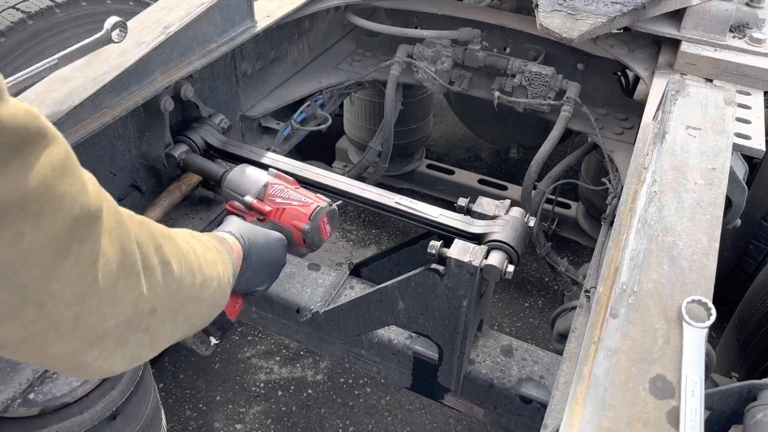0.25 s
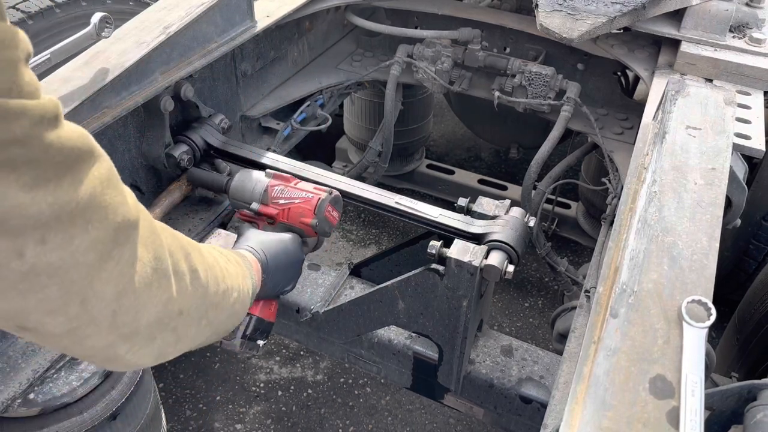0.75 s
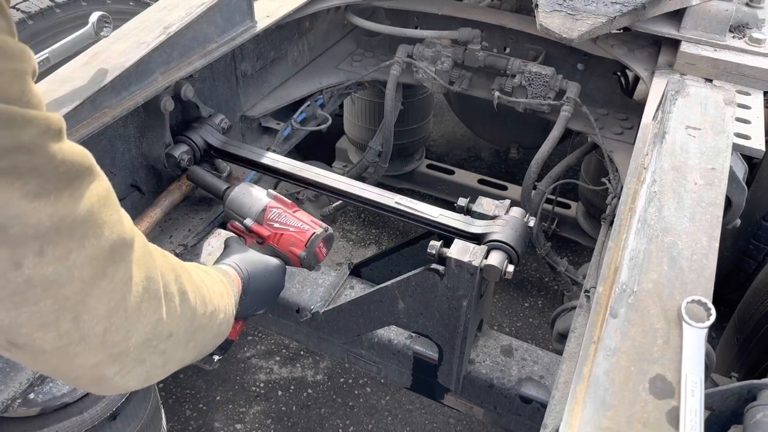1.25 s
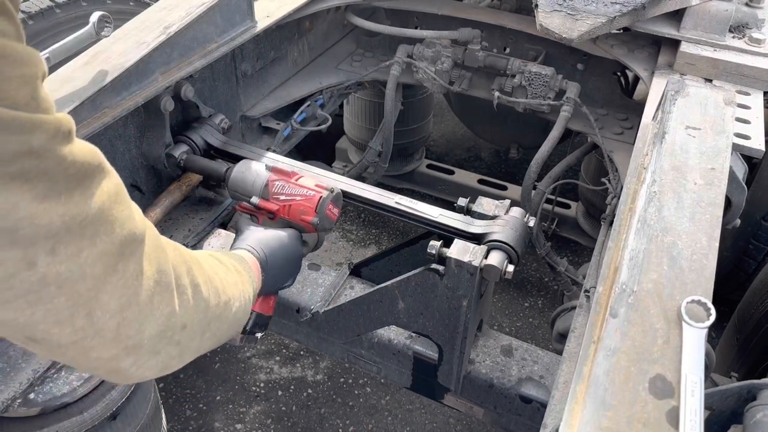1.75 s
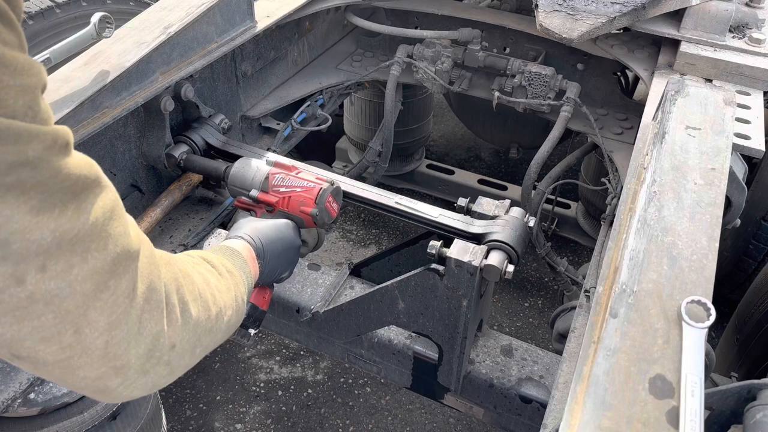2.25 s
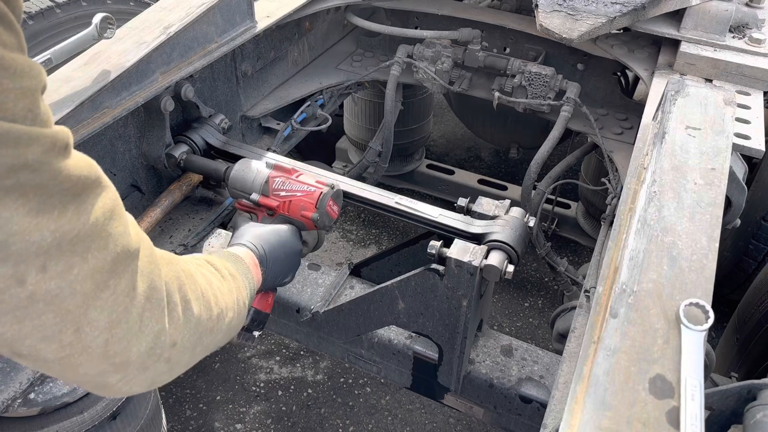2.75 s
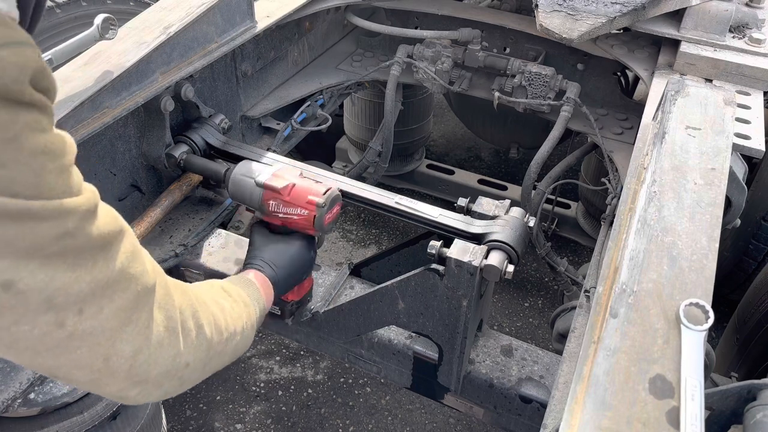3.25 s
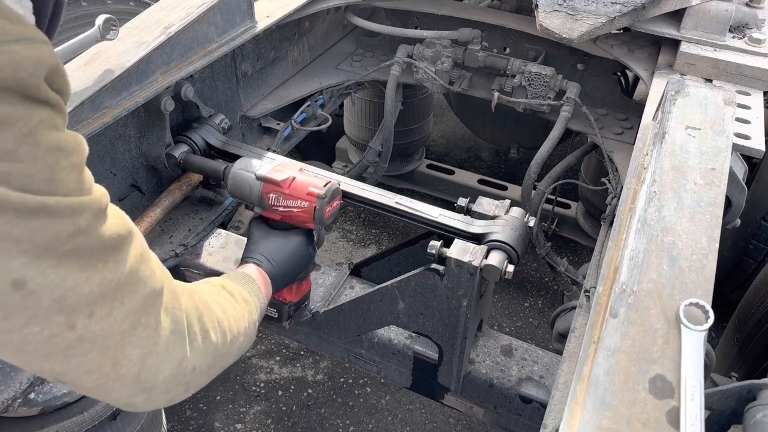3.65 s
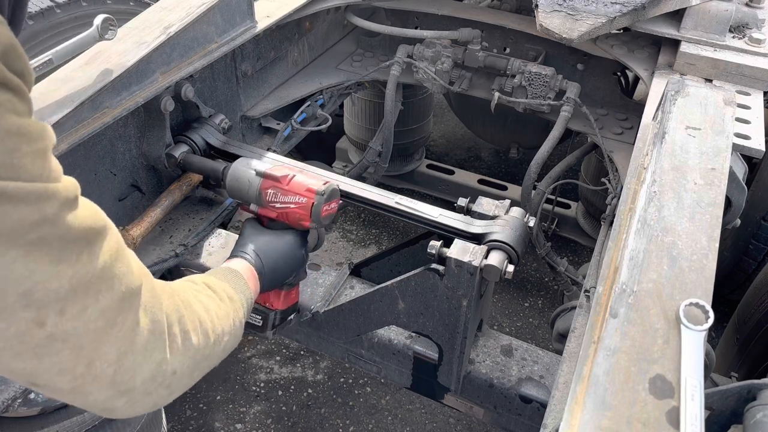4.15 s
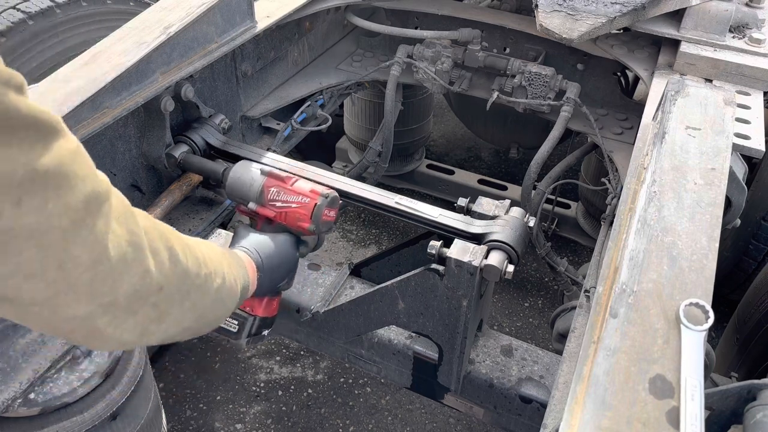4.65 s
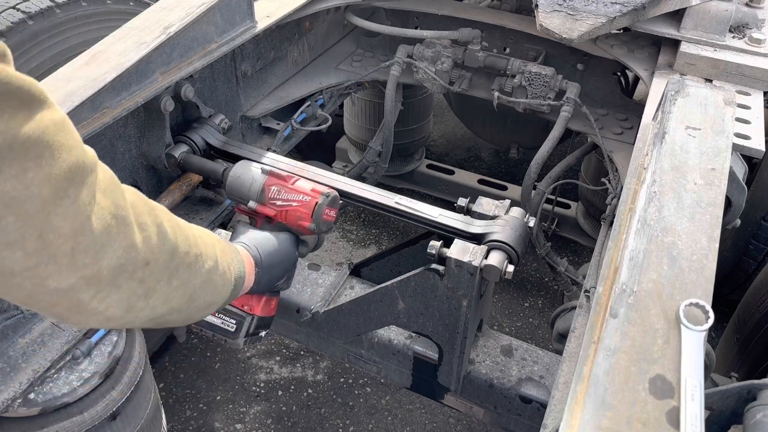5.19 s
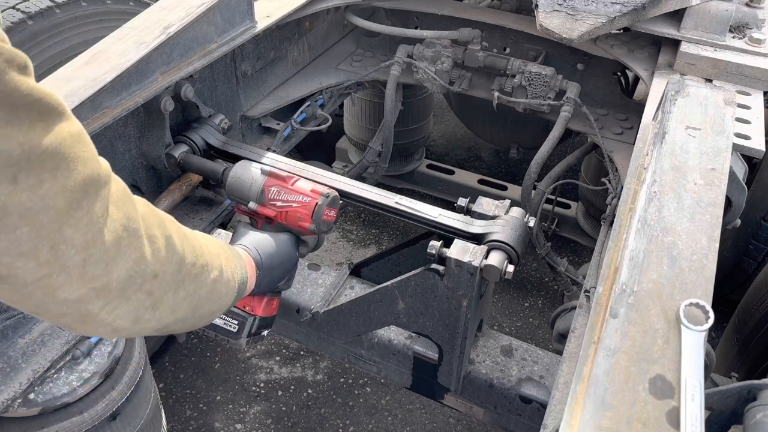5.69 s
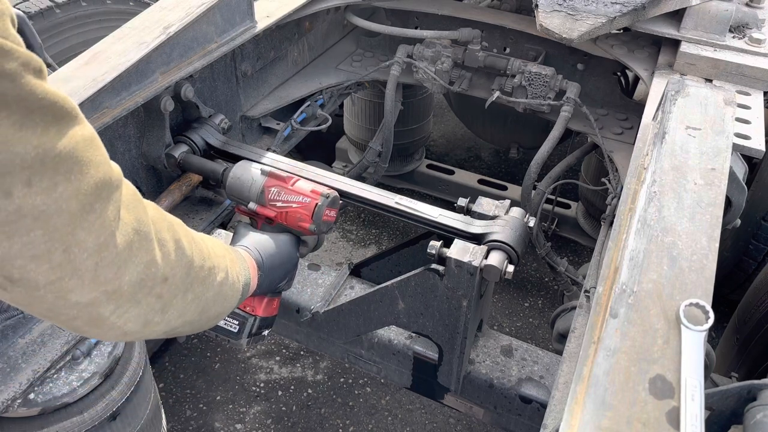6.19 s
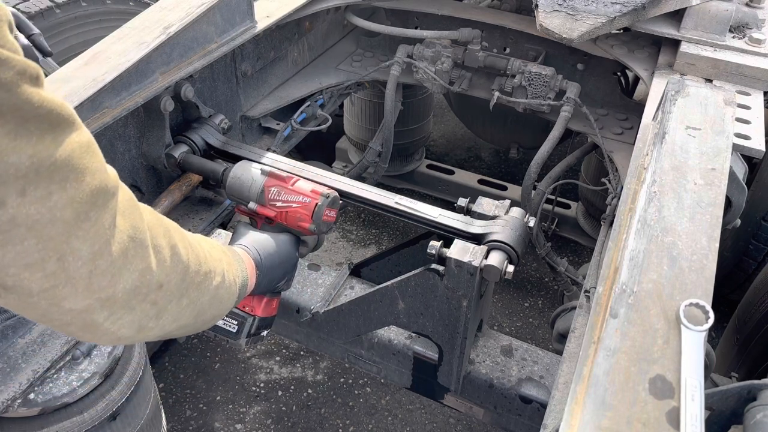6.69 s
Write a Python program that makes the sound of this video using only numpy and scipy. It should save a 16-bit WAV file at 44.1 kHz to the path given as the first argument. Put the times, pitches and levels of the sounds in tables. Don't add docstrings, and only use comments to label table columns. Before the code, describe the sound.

Close outdoor stereo, slightly left: a metal socket knocks and scrapes against a heavy steel frame, one hard clank standing out, then a faint squeak and lighter knocks. A power wrench whines briefly and hammers seven rapid metallic blows. After a dull knock and sparse light taps, the loose socket clinks brightly on the bolt head. Wind thumps the microphone throughout, over low distant rumble and soft hiss.

```python
import sys
import numpy as np
from scipy import signal
from scipy.fft import rfft, irfft, next_fast_len
from scipy.io import wavfile

SR = 44100
rng = np.random.default_rng(int(sys.argv[2]) if len(sys.argv) > 2 else 0)


def wav_out(sig):
    wavfile.write(sys.argv[1], SR, np.round(np.clip(np.atleast_2d(sig).T, -1, 1) * 32767).astype(np.int16))


def invert_db(x):
    u = np.asarray(x, float) / 20
    return 10 ** u


N = 305480
TIME = np.arange(N) / SR
RING_RISE_S = 0.00022

# time in seconds, peak level in dB at 2.5 kHz, flex of the panels in dB,
# t60 in seconds.
HAMMER_BLOWS = [
    (2.2304, -15.5, -23.5, 0.074),
    (2.2521, -13.5, -17, 0.14),
    (2.2821, -16, -11.5, 0.11),
    (2.3074, -15, -14.5, 0.12),
    (2.3311, -15.5, -11, 0.12),
    (2.3592, -19, -14, 0.22),
    (2.3868, -15.5, -11, 0.12),
]
# frequency in Hz, level in dB, t60 in seconds.
RAIL_MODES = [(994, -16.5, 0.14), (1190, -22, 0.31), (1490, -8, 0.34), (1692, -14, 0.17), (1840, -16, 0.34),
              (1990, -23, 0.19), (2200, -20, 0.16), (2350, -19.5, 0.31), (2520, -2.5, 0.14),
              (2700, -13.5, 0.38), (3610, -8, 0.13), (3600, -13.5, 0.066), (3940, -25.5, 0.03),
              (4320, -48, 0.052), (4850, -13.5, 0.079)]
# frequency in Hz, level in dB, share of the t60.
DENSE_MODES = [(120, -4.5, 1.4), (300, -7, 2.6), (586, -6, 1.3), (1140, 2, 0.96), (2030, -2, 0.84),
               (5220, 0, 0.73), (9690, 5, 0.39), (10500, 1.5, 0.089), (15850, -0.5, 0.42)]


def rms_one(x):
    return x / np.sqrt(np.mean(x ** 2) + 1e-20)


def in_time(rows):
    s, *columns = np.transpose(rows)
    return [np.interp(TIME, s, c) for c in columns]


def at_hz(points, hz, axis=1):
    points = np.array(points)
    return np.interp(np.log(hz), np.log(points[:, 0]), points[:, axis])


def drift(rate):
    r = np.exp(-80 * np.pi * rate / SR)
    white = rng.standard_normal(N // 40 + 2002)
    slow = signal.lfilter([1], [1, -2 * r, r * r], white)[2000:]
    return np.interp(np.arange(N) / 40, np.arange(len(slow)), rms_one(slow))


def ring(clicks, hz, t60):
    r = invert_db(-60 / (max(t60, .004) * SR))
    w = 2 * np.pi * hz / SR
    return signal.lfilter([0, np.sin(w)], [1, -2 * r * np.cos(w), r * r], clicks + 1e-18)


def band(x, low_hz, high_hz, order=2):
    return signal.sosfilt(signal.butter(order, [low_hz, high_hz], "band", fs=SR, output="sos"), x)


def colour(x, peaks):
    for hz, width_hz, db in peaks:
        x = x + (invert_db(db) - 1) * signal.lfilter(*signal.iirpeak(hz, hz / width_hz, fs=SR), x)
    return x


def pair(mid, side, alike):
    alike = np.clip(alike, 0, 1)
    return (np.sqrt(1 + alike) * mid + np.sqrt(1 - alike) * side * [[1], [-1]]) / np.sqrt(2)


def noise_bank():
    edges_hz = 100 * 2 ** np.arange(0, 7.6, .5)
    white = rng.standard_normal((2, 2, N))
    return [(np.sqrt(lo * hi), *band(white[k % 2], lo, hi))
            for k, (lo, hi) in enumerate(zip(edges_hz, edges_hz[1:]))]


def background(bank, patchy_db=2.2):
    # frequency in Hz, level in dB per Hz.
    air_spectrum = [(88, -25.5), (150, -21), (320, -4.5), (790, -7.5), (1100, -10), (2200, -21.5),
                    (4600, -34.5), (9000, -33), (11500, -41), (16000, -40)]
    # time in seconds, rumble level in dB.
    swell_curve = [(0, -62.5), (.7, -56.5), (1.6, -62), (5.5, -59.5), (5.9, -58.5), (6.93, -60.5)]
    # frequency in Hz, left-right likeness from 0 to 1.
    air_likeness = [(60, 0.87), (200, 0.29), (700, 0.0334), (2400, 0.05), (8000, 0.65), (14000, 0.12)]
    # frequency in Hz, level in dB.
    faint_tones = [(8473, -78.5), (14363, -68.5)]
    air_db = -51
    swell_db, = in_time(swell_curve)
    swell_db = swell_db - np.median(swell_db)
    air = np.zeros((2, N))
    for hz, mid, side in bank:
        level_db = at_hz(air_spectrum, hz) + swell_db * (hz < 3200) + patchy_db * drift(4.6)
        air += invert_db(level_db) * pair(np.roll(mid, SR), np.roll(side, SR), at_hz(air_likeness, hz))
    hum = sum(invert_db(db + 2 * drift(25)) * np.sin(2 * np.pi * hz * TIME + .12 * drift(30))
              for hz, db in faint_tones)
    return invert_db(air_db) * rms_one(air) + hum


def wind(lump_db=3.0, flutter_lump_db=3.5):
    # time in seconds, rumble level in dB.
    stream_curve = [(0, -44.5), (.1, -41.5), (.7, -38.5), (1.42, -44), (1.48, -26.5), (1.93, -24),
                    (2.02, -37.5), (2.9, -39), (3.45, -44), (3.75, -48.5), (4.3, -38.5), (4.62, -41),
                    (5.05, -45.5), (5.3, -29), (5.8, -42.5), (5.95, -25.5), (6.3, -35), (6.93, -27)]
    # crest in seconds, rumble level in dB, length in seconds.
    puff_rows = [(.77, -37, .083), (.922, -38, .038), (1.243, -38, .087), (1.36, -36, .11),
                 (1.61, -24, .084), (1.709, -29, .022), (1.783, -23, .055), (1.857, -21.5, .038),
                 (2.23, -30.5, .078), (2.55, -39.5, .097), (2.674, -40, .027), (3.02, -35, .11),
                 (3.124, -33.5, .052), (3.376, -32.5, .108), (4.242, -34.5, .074), (4.653, -33, .18),
                 (4.946, -31, .095), (5.15, -34, .038), (5.275, -25.5, .13), (5.61, -28, .044),
                 (5.892, -28.5, .036), (6.095, -15, .025), (6.2, -18.5, .12), (6.56, -27, .032),
                 (6.624, -21.5, .022), (6.737, -26.5, .035), (6.874, -26, .025), (6.372, -26, .045)]
    # time in seconds, peak level in dB, frequency in Hz.
    buffet_rows = [(1.607, -13.5, 143), (1.626, -14.5, 191), (1.733, -15, 140), (1.78, -7, 140),
                   (1.837, -5.5, 188), (2.787, -24, 163), (2.999, -23, 163), (3.357, -17.5, 199),
                   (4.655, -24, 139), (4.936, -22.5, 140), (5.255, -13, 131), (5.884, -24.5, 135.7),
                   (5.925, -31.5, 200), (5.974, -19.5, 240), (6.031, -12, 327), (6.0885, -7.5, 300),
                   (6.093, -10, 147), (6.225, -8, 151), (6.131, -18, 131), (6.186, -16, 136),
                   (6.218, -8, 180), (6.35, -18.5, 210), (6.377, -15.5, 300), (6.542, -23, 126),
                   (6.619, -16, 272), (6.724, -13.5, 362), (1.845, -15, 80), (6.865, -23, 240)]
    likeness = .8
    stream_db, = in_time(stream_curve)
    rumble_gain = invert_db(stream_db)
    flutter_gain = invert_db(-53 + 1.0163 * (stream_db + 39.5))
    for s, db, length in puff_rows:
        crest = invert_db(db - 3.5) * np.exp(-((TIME - s) / (0.49 * max(length, .01))) ** 2)
        rumble_gain = rumble_gain + crest
        flutter_gain = flutter_gain + crest * invert_db(-12.5 + 0.93 * (db + 25.5))

    white, eddies = rng.standard_normal((2, 2, N)), drift(25.7)
    rumble = rms_one(band(invert_db(lump_db * eddies) * band(white[0], 41.3, 121.2), 39, 243))
    flutter_lumps = invert_db(flutter_lump_db * np.clip(1.3 * eddies + drift(29), -2, 2))
    flutter = rms_one(band(flutter_lumps * band(white[1], 126, 311.0), 41.6, 664))
    out = pair(*(rumble_gain * rumble + flutter_gain * invert_db(6.5) * flutter), likeness)

    t = TIME[:SR // 10]
    leans_db = rng.uniform(-2.5, 3.5, len(buffet_rows))
    for (s, db, hz), lean_db in zip(buffet_rows, leans_db):
        turns = hz * t
        swing = np.sin(2 * np.pi * turns / (1 + 0.0074 * turns) + 1.0)
        swing = invert_db(db + 1.5) * swing * np.exp(-((turns - 1.1) / 0.5) ** 2)
        i = round((s - .003) * SR)
        out[:, i:i + len(t)] += swing[:N - i] * invert_db(np.array([[lean_db], [-lean_db]]))
    return out


def steel(bank, hits, hollow_db, crack_db=-1.0, crack_db_per_octave=2.5, rise_s=.0009):
    # frequency in Hz, left-right likeness from 0 to 1.
    steel_likeness = [(300, 0.87), (1500, 0.24), (5000, 0.2), (10000, 0.96)]
    out, t = np.zeros((2, N)), TIME[:SR // 4]
    luck = rng.normal(0, 1, (len(hits), 20))
    for k, (hz, mid, side) in enumerate(bank):
        shake = np.zeros(N + len(t))
        crack = invert_db(crack_db + crack_db_per_octave * np.log2(hz / 2500) - 60 * t / 0.0021)
        rise = 1 - np.exp(-t / (rise_s + 1.85 / hz))
        for (s, db, low_db, high_db, t60), chance in zip(hits, luck):
            colour_db = at_hz([(600, low_db + 5.0), (2500, 0.015), (4000, 0.71 * high_db),
                               (6000, high_db + 4.0 + hollow_db), (9000, high_db - 4.5)], hz)
            decay_db = -60 * t / max(t60 * at_hz(DENSE_MODES, hz, axis=2), .01)
            tail = invert_db(decay_db) + invert_db(-17.0 + decay_db / 2) + crack
            level_db = db + colour_db + at_hz(DENSE_MODES, hz) + 2.77 * chance[k] + 3.5
            i = round((s - .0006) * SR)
            shake[i:i + len(t)] += invert_db(level_db) * tail * rise
        out += shake[:N] * invert_db(1.43 * drift(65.0)) * pair(mid, side, at_hz(steel_likeness, hz))
    return out


def modes(times, body, strength_db, spread_db, lean_db=2.0, lag=5.3):
    at, out = np.round(times * SR).astype(int), np.zeros((2, N))
    luck = rng.normal(0, 1, (len(times), 60))
    aim = rng.normal(0, 1, (30, 2))
    for k, (hz, db, t60) in enumerate(body):
        clicks = np.zeros(N)
        sign = np.sign(luck[:, 30 + k])
        clicks[at] = invert_db(strength_db(hz) + db + spread_db * luck[:, k]) * sign
        tone = ring(clicks, hz, t60)
        late = round(lag * aim[k, 1] * min(1, 2500 / hz))
        out[0] += tone * invert_db(lean_db * aim[k, 0] / 2)
        out[1] += np.roll(tone, late) * invert_db(-lean_db * aim[k, 0] / 2)
    return out


def knocks(bank):
    # time in seconds, peak level in dB at 2.5 kHz,
    # 600 Hz part in dB, 9 kHz part in dB, ring in dB.
    knock_rows = [(0.267, -24, 5.5, -9, -17), (0.461, -50.5, 30.5, -7.5, -15), (0.504, -43.5, 16, -31, -26),
                  (0.5235, -33.5, 11, -43, -24), (0.5558, -24.5, -0.5, -20.5, -10),
                  (0.709, -9.5, -4.5, -12.5, -17), (1.1856, -28.5, 5.5, -9.5, -18),
                  (1.246, -33.5, 2.5, -36, -26), (1.264, -38, 7.5, -2.5, -3),
                  (1.3283, -32.5, 7, -10.5, -12), (1.5207, -22.5, 11.5, -12.5, -25),
                  (1.573, -31, -12, -15.5, -10), (1.6298, -39, 15.5, -30, -26),
                  (1.8552, -42, 24.5, -42, -27), (3.031, -23, -6.5, -8.5, -24),
                  (3.367, -35.5, 11, -13.5, -28), (4.115, -34.5, 12.5, -22, -36)]
    # time in seconds, peak level in dB at 2.5 kHz,
    # 600 Hz part in dB, 9 kHz part in dB.
    tap_rows = [(0.385, -50, 9, 5.5), (1.692, -55.5, 18, -11), (1.997, -44.5, -19, -7.5),
                (2.6518, -50, -23, -7), (3.265, -49.5, 9.5, -14), (3.4086, -59, 14, -34),
                (3.713, -63.5, 31, -21), (3.805, -55, 3, -11), (3.938, -49, 23.5, -17),
                (4.014, -57, -17, -14), (4.0482, -57.5, 13, -25), (4.342, -61, -4, 0),
                (4.3773, -62, -20, 9), (4.397, -64.5, 18, 15)]
    # time in seconds, peak level in dB.
    thud_rows = [
        (0.268, -20.5),
        (0.7085, -11),
        (1.187, -25.5),
        (1.519, -19),
        (3.03, -24.5),
    ]
    # frequency in Hz, level in dB, t60 in seconds.
    panel_modes = [(166.3, -7.5, 0.33), (240, 2.5, 0.074), (298.6, 0, 0.096), (368.4, -12.5, 0.28),
                   (470.8, -6, 0.2), (682, -10, 0.064)]
    # frequency in Hz, width in Hz, level in dB.
    rail_colour = [(1160, 110, -2.5), (1300, 60, 3), (1860, 183.4, -0.5), (2300, 200, 0.5), (3300, 420, -2),
                   (3650, 130, -7.5), (4850, 103, -2), (5900, 1400, -0.5)]
    knock_t60_s, tap_t60_s, tap_ring_db = 0.13, 0.17, -11
    blow_low_db, blow_high_db, blow_ring_db = -6.5, -3.5, -15
    firm = [(s, db, low_db, high_db, knock_t60_s, ring_db) for s, db, low_db, high_db, ring_db in knock_rows]
    light = [(*tap, tap_t60_s, tap_ring_db) for tap in tap_rows]
    hammer = [(s, db, blow_low_db, blow_high_db, t60, blow_ring_db) for s, db, flex_db, t60 in HAMMER_BLOWS]
    rows = np.array(sorted(firm + light) + hammer)
    flexes = [(s, flex_db) for s, db, flex_db, t60 in HAMMER_BLOWS]
    thuds = np.array(sorted(thud_rows + flexes))
    damped = [(hz, db * .6, t60 * .75) for hz, db, t60 in RAIL_MODES]
    rails = modes(rows[:, 0], damped, lambda hz: rows[:, 1] + rows[:, 5] - 3, spread_db=6.5)
    panels = modes(thuds[:, 0] + 0.00421, panel_modes, lambda hz: thuds[:, 1] - 3, spread_db=-0.5)
    shaken = colour(steel(bank, rows[:, :5], hollow_db=-10.0), rail_colour)
    return shaken + rails + band(panels, 120, 800)


def rings():
    # time in seconds, frequency in Hz, level in dB,
    # t60 in seconds.
    frame_rings = [(.268, 1300, -24.5, 0.045), (.268, 2200, -33.5, 0.07), (.272, 4850, -42, 0.027),
                   (.71, 1490, -21, 0.089), (.71, 1873, -17, 0.076), (.71, 2285, -28, 0.12),
                   (.71, 3960, -23.5, 0.041), (.71, 4150, -23, 0.078), (.557, 2330, -41, 0.18),
                   (.71, 716, -24, 0.086), (1.188, 1255, -38.5, 0.099), (1.188, 1835, -36, 0.073),
                   (1.188, 4750, -57, 0.027), (1.33, 1480, -43.5, 0.14), (1.33, 5700, -46, 0.03),
                   (2.231, 1690, -28, 0.033), (2.231, 4850, -26.5, 0.045), (2.254, 3670, -21, 0.062),
                   (2.254, 4320, -30, .04), (2.283, 1300, -33, 0.038), (2.283, 2710, -31, 0.03),
                   (2.3095, 4850, -18, 0.035), (2.333, 3630, -18, 0.066), (2.361, 3610, -19.5, 0.081),
                   (2.389, 3710, -26.5, 0.06), (2.283, 9500, -21, .015), (2.36, 9400, -24, 0.013),
                   (3.031, 1860, -38, 0.16), (3.031, 2290, -42, 0.14), (3.031, 3560, -39.5, 0.18),
                   (3.031, 4870, -38.5, 0.077), (4.117, 860, -26, 0.076), (4.117, 1740, -45, .09),
                   (4.117, 1570, -38, 0.069), (4.395, 6500, -52, 0.091), (.536, 1300, -37, 0.12)]
    # time in seconds, frequency in Hz, level in dB, t60 in seconds.
    socket_rings = [(4.743, 1073, -21, 0.053), (4.743, 2220, -36, 0.12), (4.744, 6778, -45, 0.2),
                    (4.743, 7450, -45, .19), (4.743, 9210, -55, 0.26), (4.743, 11810, -44, 0.071),
                    (4.743, 15700, -44, 0.11), (4.988, 4829, -38, .08), (4.987, 6756, -38, .07),
                    (4.988, 12500, -36, .1), (4.988, 1940, -44, 0.093), (4.988, 15700, -40, 0.12),
                    (5.071, 3391, -33, 0.11), (5.072, 6700, -30, 0.088), (5.071, 13330, -50, 0.11),
                    (5.071, 12600, -45, 0.091), (5.071, 8926, -42, 0.089), (5.071, 14600, -49, .07),
                    (5.293, 4940, -17, 0.037), (5.293, 5060, -30.5, 0.057), (5.302, 4950, -26, 0.045),
                    (5.293, 6390, -26, 0.12), (5.293, 9500, -30, 0.1), (5.294, 8700, -35, 0.12),
                    (5.293, 14600, -28, .05), (5.293, 13320, -35.5, 0.16), (5.293, 12700, -25, .09),
                    (5.298, 15650, -35, 0.11), (5.293, 3250, -41, .3), (5.476, 13430, -45.5, .13),
                    (5.476, 15000, -37.5, .11), (5.376, 4800, -42, 0.061), (5.475, 6810, -15, 0.093),
                    (5.476, 6990, -22.5, 0.061), (5.484, 6470, -21.5, 0.059), (5.475, 3120, -29.5, .11),
                    (5.476, 5400, -23.5, 0.061), (5.476, 1060, -31, 0.1), (5.476, 2330, -42, 0.065),
                    (5.842, 7050, -33, 0.09), (5.843, 5000, -28.5, 0.052), (5.841, 3900, -30.5, 0.08),
                    (5.843, 9254, -48, 0.037), (5.846, 15660, -38, .1), (5.98, 2380, -44, .08)]
    twin_hz, twin_db, flicker_db = 70, -5.5, 2.5
    rows, out, t = frame_rings + socket_rings, np.zeros((2, N)), TIME[:SR // 4]
    rise = 1 - np.exp(-t / RING_RISE_S)
    for (s, hz, db, t60), (twin, lean) in zip(rows, rng.uniform(-0.67, 1, (len(rows), 2))):
        tone = np.sin(2 * np.pi * hz * t)
        tone = tone + invert_db(twin_db) * np.sin(2 * np.pi * (hz + twin_hz * twin) * t + 2)
        decay = invert_db(db - 60 * t / max(t60, .005))
        i = round(s * SR)
        out[:, i:i + len(t)] += decay * rise * tone * invert_db(np.array([[2 * lean], [-2 * lean]]))
    return out * invert_db(flicker_db * drift(70))


def scrape(bank):
    # time in seconds, level in dB, 9 kHz part in dB.
    scrape_curve = [(.45, -75, -20), (.47, -70, -4), (.55, -59, -19), (.63, -55.5, -16), (.69, -74, -20),
                    (.72, -96, -5), (5.16, -88, -19), (5.19, -69, -19), (5.22, -45, -18), (5.27, -44, -7.5),
                    (5.3, -38, -29.5), (5.42, -69, -13)]
    level_db, high_db = in_time(scrape_curve)
    grain = invert_db(level_db + 1.25 * np.clip(drift(100), -2, 2))
    grain = grain * (level_db > -69) * (TIME < scrape_curve[-1][0])
    dull = sum(invert_db(at_hz(DENSE_MODES, hz)) * pair(mid, side, 0.15) for hz, mid, side in bank if hz < 5500)
    dull = colour(dull, [(hz, 50, 9.0) for hz, db, t60 in RAIL_MODES])
    bright = sum(pair(mid, side, 0.3) for hz, mid, side in bank if hz > 5500)
    return grain * (rms_one(dull) + invert_db(high_db) * rms_one(bright))


def ticks():
    # time in seconds, centre in Hz, peak level in dB, t60 in seconds.
    tick_rows = [(0.507, 6650, -48, 0.024), (.519, 6760, -50, 0.027), (.536, 6600, -40, 0.015),
                 (0.557, 7740, -35, 0.048), (.709, 10100, -14.5, 0.011), (.862, 4800, -59, 0.052),
                 (4.219, 4500, -60, .02), (4.342, 4600, -56, .02), (4.379, 4520, -48, 0.018),
                 (4.385, 9800, -55, .05), (5.376, 2870, -39.5, 0.15), (5.294, 6240, -36, 0.14),
                 (5.484, 3190, -35, 0.066), (6.087, 600, -22.5, 0.043), (6.218, 542, -24.5, 0.052),
                 (1.857, 1500, -42.5, 0.058), (1.631, 1500, -40, 0.088), (6.724, 586, -32, 0.034)]
    anvil_hz, anvil_db, anvil_t60_s = 12170, -10, 0.033
    span = 1.22
    rows = tick_rows + [(s, anvil_hz, db + anvil_db, anvil_t60_s) for s, db, flex_db, t60 in HAMMER_BLOWS]
    out, t = np.zeros((2, N)), TIME[:SR // 8]
    rise = 1 - np.exp(-t / RING_RISE_S)
    for (s, hz, db, t60), white in zip(rows, rng.standard_normal((len(rows), 2, len(t)))):
        puff = pair(*rms_one(band(white, hz / span, hz * span, order=3)), 0.69)
        i = round(s * SR)
        out[:, i:i + len(t)] += invert_db(db - 60 * t / max(t60, .005)) * rise * puff
    return out


def squeals(rough_db=4.5, waver=.006):
    # crest in seconds, frequency in Hz, level in dB, length in seconds.
    squeal_rows = [(0.98, 2120, -66, 0.055), (1.08, 4040, -73, 0.07), (1.07, 2330, -69, .07),
                   (.62, 14550, -60, .05), (5.21, 4850, -58, 0.011), (5.24, 4890, -37, 0.019),
                   (5.471, 4850, -50, 0.0074)]
    flicker = invert_db(rough_db * drift(80))
    wander = np.cumsum(1 + waver * drift(58)) / SR
    out = 0
    for s, hz, db, length in squeal_rows:
        swell = invert_db(db) * np.exp(-((TIME - s) / length) ** 2)
        out = out + swell * np.sin(2 * np.pi * hz * wander)
    return out * flicker


def slide():
    # time in seconds, level in dB.
    slide_curve = [
        (.8, -90),
        (.88, -69),
        (1., -62),
        (1.08, -59),
        (1.15, -62),
        (1.18, -90),
    ]
    # frequency in Hz, level in dB, how long it lasts in seconds, when it is loudest in seconds.
    slide_partials = [(1820, 6, .09, 1.09), (2630, 1, .05, 1.03), (3350, -2, .13, 1.07),
                      (4420, -6, .13, .98)]
    level_db, = in_time(slide_curve)
    out = 0
    for hz, db, lasts, loudest in slide_partials:
        phase = 2 * np.pi * np.cumsum(hz * (1 + .014 * drift(70) + .002 * drift(4))) / SR
        turn_db = -12 * np.minimum(((TIME - loudest) / lasts) ** 2, 2.5)
        out = out + invert_db(db + turn_db + 4.5 * drift(90)) * np.sin(phase)
    return invert_db(level_db) * out * (TIME > slide_curve[0][0]) * (TIME < slide_curve[-1][0])


def wrench(bank):
    # frequency in Hz, level in dB, roughness from 0 to 1.
    whine_tones = [(2907, -70, .09), (7623, -61, 0), (7779, -59, 0), (15402, -55, 0), (15477, -56, 0)]
    # time in seconds, whine level in dB, gear hiss level in dB.
    trigger_curve = [
        (2.11, -40, -40),
        (2.118, -18, -30),
        (2.135, -2.5, 1),
        (2.19, -2, -14),
        (2.205, 9, 11),
        (2.23, -6, 17.5),
        (2.39, -5, 5),
        (2.41, -49, -51),
    ]
    # frequency in Hz, level in dB per Hz.
    gear_spectrum = [(290, -49), (500, -20), (1110, -13), (1500, -65), (2760, -5.5), (5460, -41),
                     (7680, -24), (15000, -22.5)]
    gears_db = -53.5
    whine_db, hiss_db = in_time(trigger_curve)
    load_db = np.clip(400 * (TIME - 2.185), 0, 30)
    on = (TIME > trigger_curve[0][0]) & (TIME < trigger_curve[-1][0])
    whine = 0
    for hz, db, rough in whine_tones:
        tone_db = db + 12.5 + 38.2 * rough * drift(150) - load_db * (hz > 10000)
        whine = whine + invert_db(tone_db) * np.sin(2 * np.pi * hz * TIME)
    hiss = rms_one(sum(invert_db(at_hz(gear_spectrum, hz)) * mid for hz, mid, side in bank))
    return on * (invert_db(whine_db) * whine + invert_db(gears_db + hiss_db) * hiss)


def clinks(bank, t60=0.18):
    # time in seconds, peak level in dB at 2.5 kHz, ring in dB near 4.8 kHz, 6.7 kHz and 10 kHz.
    clink_rows = [(4.7421, -21.5, -5, -7.5, -30), (4.9874, -24, -16, -2, -26),
                  (5.0708, -28.5, -23, 3.5, -28), (5.2177, -32, -20, -7, -58),
                  (5.231, -36, -17, 2.5, -31.5), (5.293, -33, 2, 7.5, -4), (5.378, -35, -17.5, -5, -57.5),
                  (5.4754, -18, -18, 10, -35), (5.769, -52.5, -9, -29.5, -35.5),
                  (5.8434, -21, -12.5, 5.5, -21), (5.959, -51, -6, -10, -45),
                  (5.9785, -29, -12.5, -12.5, -40), (6.679, -33, -12, -11, -38),
                  (6.7222, -47.5, -16, 0.5, -46)]
    # frequency in Hz, level in dB, t60 in seconds.
    socket_modes = [(1055, 0, .12), (1250, -2, .1), (1900, -2, .07), (3100, -6, .06), (3400, -6, .07),
                    (4250, -5, .07), (4690, -7, .05), (4790, -9, .09), (4960, -6, .05), (5168, -5, .07),
                    (6400, -11, .07), (6600, -29, .33), (6700, -8, .05), (6790, -9, .07), (7811, -8, .08),
                    (9240, -4, .1), (9600, -4, .05), (10030, -6, .07), (11810, -4, .08), (12620, -8, .1),
                    (13380, -8, .12), (14500, -16, .07), (15670, -22, .11)]
    # frequency in Hz, level in dB, t60 in seconds.
    sleeve_modes = [(10030, -14, .24)]
    top_ring_db = -5
    s, db, *rings_db = np.transpose(clink_rows)
    low_db = -3.5 - 0.7677 * rings_db[1]
    bright_db = (rings_db[1] + rings_db[2]) / 2 + 2.0
    mode_hz = [1000, 2500, 4800, 6700, 10000, 11800]
    strikes = list(zip(low_db - 25.0, 0 * s - 8, *rings_db, bright_db + top_ring_db))

    def strength_db(hz):
        return db + 3 + np.array([at_hz(list(zip(mode_hz, row)), hz) for row in strikes])

    free = modes(s[:2], sleeve_modes, lambda hz: db[:2] + [0, -4], spread_db=0, lean_db=0, lag=0)
    shaken = steel(bank, list(zip(s, db, low_db, bright_db, 0 * s + t60)), hollow_db=4)
    return free + shaken + modes(s, socket_modes, strength_db, spread_db=4)


def scene():
    bank = noise_bank()
    around = background(bank) + wind()
    contacts = knocks(bank) + rings() + scrape(bank) + ticks() + squeals() + slide()
    work = contacts + wrench(bank) + clinks(bank)
    return work * invert_db(np.array([[1.0], [-1.0]])) + around


def roll_off(x):
    return signal.sosfilt(signal.butter(12, 16650, fs=SR, output="sos"), x)


def record(dry):
    # frequency in Hz, phase in radians by which left leads.
    port_phase = [(20, 0), (150, .05), (600, .2), (2330, .6), (3300, 2.3), (5000, .1), (6200, .3),
                  (7900, 2.5), (10400, .2), (14000, -.2), (15700, -1.3)]
    # frequency in Hz, width in Hz, level in dB.
    port_colour = [(6500, 1800, -7), (9400, 2200, 7), (12400, 2800, -13), (15000, 1500, 0)]
    cutoff_hz = 16900
    dry = colour(dry, port_colour)
    size = next_fast_len(N + SR // 10)
    turn = np.exp(-1j * at_hz(port_phase, np.arange(1, size // 2 + 2) * SR / size))
    right = irfft(rfft(dry[1], size) * turn, size)[:N]
    rounded = 0.81 * np.tanh(np.array([dry[0], right]) / 0.8)
    mix = signal.sosfilt(signal.cheby2(10, 60, cutoff_hz, fs=SR, output="sos"), rounded)
    return roll_off(mix)


dry = scene()
out = record(dry)
wav_out(out)
```